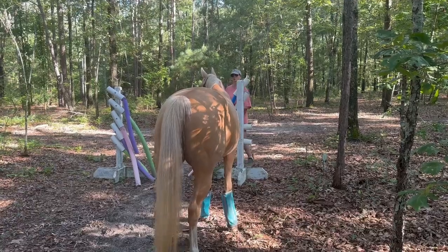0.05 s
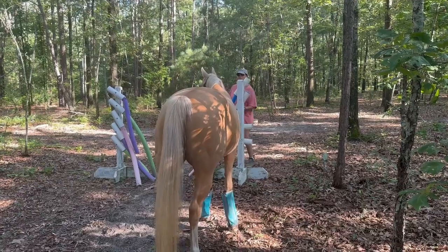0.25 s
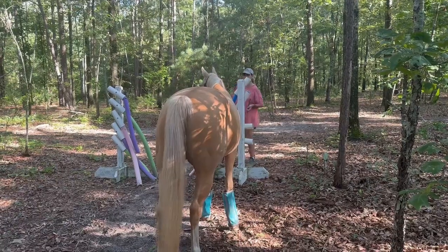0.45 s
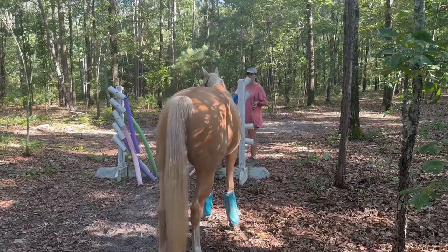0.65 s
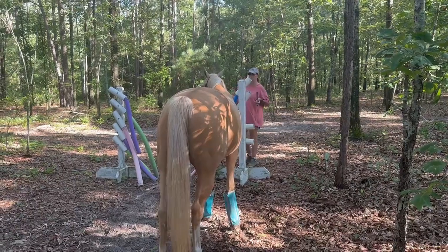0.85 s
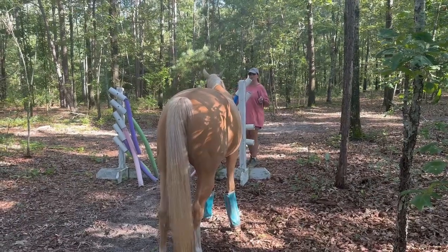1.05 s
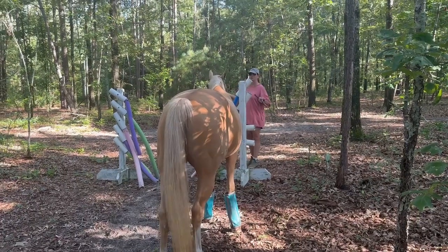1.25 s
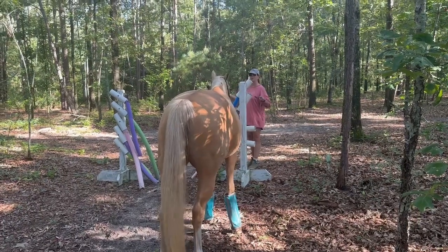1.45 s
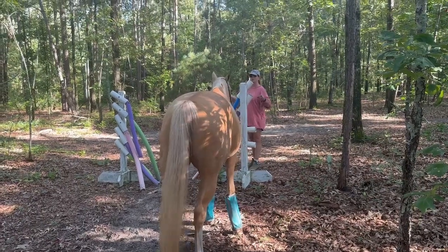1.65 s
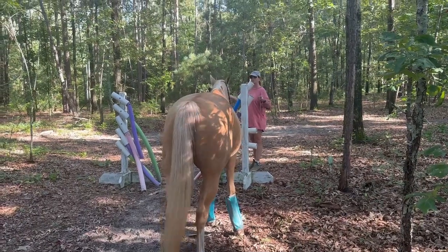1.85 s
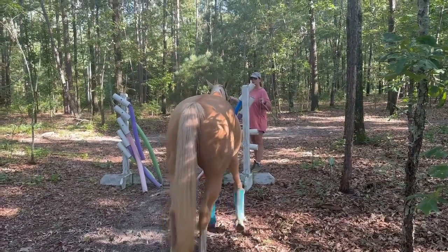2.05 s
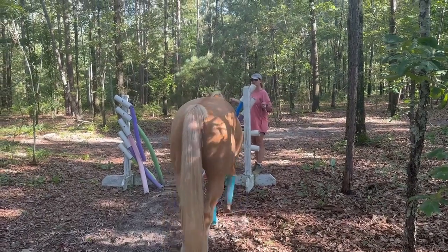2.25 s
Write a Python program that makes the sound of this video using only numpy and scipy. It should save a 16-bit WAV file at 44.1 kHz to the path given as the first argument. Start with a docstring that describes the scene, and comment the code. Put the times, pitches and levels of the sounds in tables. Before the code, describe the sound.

Two deep, dull hoof thumps sound close by as a horse shifts its weight on dry leaves. Then small twigs snap and leaves rustle lightly, slightly to the left, while a far bird whistles faintly in hushed woods.

```python
"""A horse's hooves thump twice on soft forest ground as it shifts its weight.
Each blow is a deep tone that slides as the soil gives, with a hollow knock and a dull rumble.
The second presses into dry leaves, which crackle with many tiny breaks. Then a few twigs snap and
leaves rustle. Behind it all are a faint distant bird, the quiet hiss of the woods and thin high ticking."""
import sys
import numpy as np
from scipy import signal
from scipy.fft import rfft, irfft
from scipy.io import wavfile
from scipy.ndimage import uniform_filter1d

SR = 44100
rng = np.random.default_rng(int(sys.argv[2]) if len(sys.argv) > 2 else 0)


def wav_out(sig):
    """Save sig, one row per channel (or a flat mono array), as 16-bit PCM at SR to the path in sys.argv[1]."""
    wavfile.write(sys.argv[1], SR, np.round(np.clip(np.atleast_2d(sig).T, -1, 1) * 32767).astype(np.int16))


N = 105840
TIME, FREQS = np.arange(N) / SR, np.fft.rfftfreq(N, 1 / SR)
RIGHT_LAG_S = .00036  # deep sounds reach the left side first
STEREO_TIME = TIME + np.array([[.5], [-.5]]) * RIGHT_LAG_S
# In the tables, t is the start, fade is the time to drop 60 dB, and pan is left minus right.

# Hoof blows, light touches and rebounds of the ground:
# t/s, level/dB, swell/s, first f/Hz, last f/Hz, sharpness (higher is shorter), glide/s
BLOWS = [(0.2167, -3.5, 0.01081, 338.6, 92.1, 9.73, 0.01123), (0.2333, -18.5, 0.00592, 98, 202, 1, 0.012),
         (0.3477, -33.5, .0042, 154.6, 319, .94, 0.0027), (0.3551, -27, .0256, 203, 78.8, 1, 0.031),
         (0.3848, -3.5, 0.0099, 422.8, 109.3, 2.9, 0.004524),
         (0.407, -20.5, 0.00447, 141.3, 130.8, 0.18, .0069)]


def hoof_thumps(pan_db=1.1):
    """Each blow swells and dies within a few cycles while its pitch slides as the soil gives."""
    out = np.zeros((2, N))
    for start, db, swell, first_hz, last_hz, sharpness, glide in BLOWS:
        t = np.maximum(STEREO_TIME - start, 0)
        cycles = last_hz * t + (first_hz - last_hz) * glide * (1 - np.exp(-t / glide))
        shape = (t / swell * np.exp(1 - t / swell)) ** sharpness
        out += amp(db) * shape * np.sin(2 * np.pi * cycles)
    return out * sides(pan_db)


# Hoof landings: t/s, knock level/dB, pitch factor, boost of higher tones/dB per octave, push level/dB
LANDINGS = [(0.2180, -26, 0.963, -5, -30.5), (0.3821, -26.5, 1.0, 1, -22)]
# The tones that hoof and ground ring with: f/Hz, relative level/dB, rise/s, fade/s
HOOF_TONES = [(418.8, 1, 0.0044, 0.051), (614, -11.5, 0.0024, .03), (916.2, -14, .003, 0.021)]


def hoof_knocks(pan_db=6.5):
    """A low push into the soil and a short hollow knock as each hoof lands."""
    out = np.zeros((2, N))
    for start, db, pitch, tilt_db, push_db in LANDINGS:
        out += ring(STEREO_TIME - start, hz=66, db=push_db, rise=.012, fade=.11)
        for hz, tone_db, rise, fade in HOOF_TONES:
            octaves_up = np.log2(hz / HOOF_TONES[0][0])
            level_db = db + tone_db + tilt_db * octaves_up
            out += sides(pan_db) * ring(TIME - start, hz * pitch, level_db, rise, fade)
    return out


# The soil shaking at each blow, and soft bumps as the weight shifts: t/s, level/dB, rise/s, hold/s, fade/s
SOIL_SHAKES = [(0.163, -50, 0.0088, 0.017, 0.064), (0.205, -30, 0.0167, 0.021, 0.115),
               (0.319, -33, 0.066, .05, 0.23), (0.513, -51.5, 0.0277, 0.01337, 0.215),
               (0.698, -59, 0.0165, 0.0504, 0.098), (0.821, -60, 0.0121, 0.025, .1),
               (1.755, -60.5, 0.0088, 0.0235, 0.073), (1.842, -60.5, 0.0071, 0.022, 0.071)]
# The soil's dull tone: f/Hz, relative level/dB
SOIL_TONE = [(25, -6), (60, -0.5), (130, 6), (240, 1.5), (330, -12.5), (430, -8), (600, -21), (900, -32),
             (1300, -39), (3000, -62)]


def soil_rumble():
    """The soil shakes under the horse in short swells of deep noise."""
    lag = 2 * np.pi * FREQS * RIGHT_LAG_S
    rumble = stereo(noise(), noise(), amp(curve(SOIL_TONE)), pan_db=2.1, likeness=1.0, phase=lag)
    return rumble * sum(envelope(*row) for row in SOIL_SHAKES)


# The hoof pressing on dry leaves: t/s, level/dB, rise/s, hold/s, fade/s
LEAF_PRESSES = [(0.349, -57, 0.0045, 0.06, 0.3), (0.403, -45, 0.0012, 0.0542, 0.045),
                (0.445, -52.5, 0.024, 0.0098, 0.083)]
# The tone of crushed leaves: f/Hz, relative level/dB
LEAF_TONE = [(410, -24.5), (700, -9), (737, -17.5), (873, -16.5), (968, -29.5), (1210, -4), (1410, -0.5),
             (1510, -2), (1690, -11), (1880, -8), (2110, -12), (2530, -12.5), (2770, -22), (3590, -36.5),
             (4040, -16.5), (4840, -14.5), (5880, -23), (7430, -23), (8570, -38), (8910, -31.5),
             (9500, -29), (11700, -44), (15600, -43.5)]
# Where the crunch sits: f/Hz, pan/dB
LEAF_PAN = [(700, 6), (1290, -1), (2380, 15), (3400, 8.5), (4400, 10.5), (5700, 9), (7300, 23), (9000, 0.5),
            (15000, 1.5)]
# How alike its left and right are: f/Hz, likeness (1 is the same)
LEAF_LIKENESS = [(600, 1), (1400, 0.44), (3100, 0.22), (7000, 0.37), (9500, 0.916)]


def leaf_crunch():
    """Dry leaves crackle while the hoof settles on them."""
    leaves = stereo(crackle(), crackle(), amp(curve(LEAF_TONE)), curve(LEAF_PAN), curve(LEAF_LIKENESS))
    return leaves * sum(envelope(*row) for row in LEAF_PRESSES)


# Grit and twigs snapping: t/s, level/dB, f/Hz, width/Hz, fade/s, relative click level/dB, pan/dB
TWIG_SNAPS = [(0.2185, -35.5, 1443, 260, 0.0152, -23, 6), (0.2194, -51, 2658, 500, 0.0069, -19.5, 7.5),
              (0.3764, -45, 1600, 700, .015, -26, 15.5), (0.3815, -41.5, 2000, 1041, 0.0091, -14.5, 4.5),
              (0.4042, -41.5, 1323, 280, .025, -5.5, 10.5), (0.53, -57.5, 585, 251.3, 0.0537, -13.5, 5.5),
              (1.0590, -61, 1890, 596, .05, -13, 2), (1.3533, -52, 1240, 250, 0.0208, -19.5, 3),
              (1.3572, -42.5, 1761, 128.4, 0.0276, -30, 8.5), (1.643, -43.5, 1720, 510, 0.036, -18, 10)]
# The tone of the bright click: f/Hz, relative level/dB
CLICK_TONE = [(500, -49.5), (3300, -14.5), (4300, -1), (5500, -8.5), (7000, -14.5), (8700, -20),
              (9700, -9.5), (11500, -40), (16000, -54)]


def twig_snaps(rise=.0005, hold=.00031):
    """Each snap is a short woody burst of noise with a bright click on top."""
    out = np.zeros((2, N))
    for start, db, hz, width_hz, fade, click_db, pan_db in TWIG_SNAPS:
        shape = envelope(start, db, rise, hold, fade)
        burst = colour(noise(), band(hz, width_hz)) * shape
        wood = colour(burst, band(hz, 2 * width_hz)) * shape.std()  # the shape sets the energy
        click_shape = envelope(start, db + click_db, rise, hold, fade=.016)
        click = colour(noise(), amp(curve(CLICK_TONE))) * click_shape
        out += (wood + click) * sides(pan_db)
    return out


# Light rustles of leaves: t/s, level/dB, rise/s, hold/s, fade/s, f/Hz, width/Hz
LEAF_BRUSHES = [(1.039, -67, .015, .01, .1, 6900, 600), (1.351, -63.5, .003, .006, 0.084, 6850, 600),
                (1.421, -69.5, .004, .01, 0.05, 10740, 1300), (1.641, -56.5, .001, .004, 0.137, 6497, 514),
                (1.647, -54, .003, .008, 0.116, 2045, 600), (2.066, -75.5, .004, .02, .12, 10300, 1300),
                (2.312, -66, 0.0347, 0.0286, 0.13, 6790, 1100),
                (2.333, -54.5, 0.0098, 0.018, 0.134, 1830, 810), (2.342, -74, .006, .025, .12, 11500, 3000)]
# Where the rustles sit: f/Hz, pan/dB
BRUSH_PAN = [(1500, 7), (7000, 14), (9500, 1.5)]


def leaf_rustles():
    """Dry leaves brush in brief, grainy whispers."""
    out = np.zeros((2, N))
    for *shape, hz, width_hz in LEAF_BRUSHES:
        leaves = stereo(crackle(), crackle(), band(hz, width_hz), curve(BRUSH_PAN), likeness=.7)
        out += leaves * envelope(*shape)
    return out


# The bird's whistles: t/s, length/s, f/Hz, level/dB
BIRD_NOTES = [(1.857, 0.092, 2350, -60), (2.054, 0.102, 2441, -59.5)]


def distant_bird(waver=.00586, pan_db=13):
    """A far-off bird whistles faint notes whose pitch wavers a little."""
    out = np.zeros(N)
    for start, length, hz, db in BIRD_NOTES:
        pitch = hz * (1 + waver * unit(uniform_filter1d(noise(), size=300)))
        arch = np.sin(np.pi * np.clip((TIME - start) / length, 0, 1))
        out += amp(db) * arch * np.sin(2 * np.pi * np.cumsum(pitch) / SR)
    return out * sides(pan_db)


# The tone of the open air: f/Hz, relative level/dB, pan/dB
AIR_TONE = [(20.49, -22, 1.35), (35, -6.5, 1.99), (49.6, 3, -4), (80, -5, 2.3), (120.4, -3, 0.42),
            (199, -16.5, 1.81), (330, -21, -1.17), (491.2, -15, 5), (646.4, -24.5, 5), (853, -29, 7.5),
            (1096, -25, 0.07), (1409, -12.5, -0.35), (1700, -17, 11), (2120, -10, 18.5),
            (2300, -13.5, 23.5), (2407, -21, 4.5), (2970, -20.5, -0.3), (3500, -23.0, 6.5), (3829, -21, 6),
            (5180, -21.5, 15), (4880, -25, 6), (5560, -14, 3.54), (5944, -27, -8.53), (6290, -32, -2.58),
            (6700, -35, 5), (7490, -32, 12), (7800, -36, 7.5), (9200, -49, 2.11), (9900, -40.5, -1),
            (10700, -38, 0.44), (11700, -42, -2), (13240, -41.5, 1.8), (15600, -40, -4.15)]
# How alike its left and right are: f/Hz, likeness (1 is the same)
AIR_LIKENESS = [(60, .95), (250, .92), (450, .8), (750, .5), (1250, .8), (2000, .65), (3300, .55),
                (4500, .45), (5600, .55), (6500, .3), (9000, .4), (10500, .4), (15000, .4)]
# How far its left side runs ahead: f/Hz, phase/rad
AIR_LEAD = [(60, .15), (400, .4), (1200, 0), (1640, .7), (2150, -.5), (3200, .3), (4000, 1.6), (5000, 3.6),
            (5750, 3.1), (6300, 0), (15000, 0)]


def forest_air(level_db=-54.5, drift_db=1.0747):
    """The open air hisses and rumbles steadily, drifting in soft patches."""
    air = stereo(noise(), noise(), amp(curve(AIR_TONE)), curve(AIR_TONE, column=2),
                 curve(AIR_LIKENESS), curve(AIR_LEAD))
    cells = signal.stft(air, nperseg=512)[2]  # a grid of pitch against time
    patches = uniform_filter1d(rng.standard_normal(cells.shape[1:]), size=8, axis=0)  # blur over pitch
    patches = unit(uniform_filter1d(patches, size=14, axis=1))  # blur over time
    return amp(level_db) * signal.istft(cells * amp(drift_db * patches))[1][:, :N]


# The thin tone of the ticks: f/Hz, relative level/dB
TICK_TONE = [(7000, -45), (9400, -26), (10500, -3), (11200, -11.5), (12100, -13.5), (12700, -2),
             (13500, -7.5), (15600, -16.5)]


def high_ticks(level_db=-83, base_gap_s=1 / 30, unevenness=.4):
    """Tiny, very high ticks come at uneven gaps, the same on both sides."""
    gaps = base_gap_s * (1 + unevenness * rng.uniform(-.74, 1, size=200))
    at = np.cumsum(gaps) * SR
    pulses = np.bincount(at[at < N].astype(int), minlength=N)
    return amp(level_db) * colour(pulses, amp(curve(TICK_TONE)))


def crackle(breaks_per_s=4600, spread_db=4, bed_gain=.56):
    """Many tiny breaks of uneven size over a bed of finer ones."""
    size = amp(spread_db * np.minimum(rng.exponential(1, N), 4))
    breaks = size * np.sign(noise()) * (rng.random(N) < breaks_per_s / SR)
    return unit(breaks) + bed_gain * noise()


def ring(t, hz, db, rise, fade):
    """One tone that swells smoothly and dies away."""
    swell = np.sin(np.pi / 2 * np.clip(t / rise, 0, 1)) ** 2
    return amp(db - 60 * np.maximum(t - rise, 0) / fade) * swell * np.sin(2 * np.pi * hz * t)


def envelope(start, db, rise, hold, fade):
    """A loudness shape that rises, holds and fades."""
    t = TIME - start
    return np.clip(t / rise, 0, 1) * amp(db - 60 * np.maximum(t - rise - hold, 0) / fade)


def noise():
    """Plain white hiss."""
    return rng.standard_normal(N)


def amp(db):
    """Turns decibels into a gain."""
    return 10 ** (np.asarray(db) / 20)


def unit(x):
    """Scales a signal to an average strength (rms) of 1."""
    return x / np.sqrt(np.mean(x ** 2) + 1e-20)


def curve(points, column=1):
    """Joins a table's points into a value for every frequency."""
    table = np.transpose(points)
    return np.interp(np.log(FREQS + 1), np.log(table[0] + 1), table[column])


def colour(x, gain):
    """Shapes the tone with one gain per frequency, then scales to strength 1."""
    return unit(irfft(rfft(x) * gain, N))


def band(hz, width_hz):
    """Gains that peak at one frequency and drop steeply around it."""
    return 1 / (1 + ((FREQS - hz) / width_hz) ** 2) ** 1.494


def sides(pan_db):
    """Left and right gains that average 1; a positive pan leans left."""
    gains = amp(np.array([np.atleast_1d(pan_db), -np.atleast_1d(pan_db)]) / 2)
    return gains / gains.mean(0)


def stereo(a, b, gain, pan_db, likeness, phase=0):
    """Blends two unrelated signals into a shaped, partly alike left and right of strength 1."""
    likeness, balance = np.clip(likeness, -1, 1), sides(pan_db)
    left = rfft(a)
    right = (likeness * left + np.sqrt(1 - likeness ** 2) * rfft(b)) * np.exp(-1j * phase)
    return unit(irfft(np.array([left, right]) * gain * balance / np.hypot(*balance), N))


def scene():
    """Hooves, leaves and twigs in front of the woods."""
    hooves = hoof_thumps() + hoof_knocks() + soil_rumble()
    forest_floor = twig_snaps() + leaf_crunch() + leaf_rustles()
    return hooves + forest_floor + distant_bird() + forest_air() + high_ticks()


def record(dry):
    """Trims away the deepest rumble and the highest treble."""
    low_cut_hz, high_cut_hz = 40, 15780
    thinned = irfft(rfft(dry) * FREQS ** 4 / (FREQS ** 4 + low_cut_hz ** 4), N)
    treble_cut = signal.firwin(801, high_cut_hz, window=("kaiser", 10), fs=SR)
    return signal.oaconvolve(thinned, treble_cut[None], "same")


dry = scene()
out = record(dry)
wav_out(out)
```